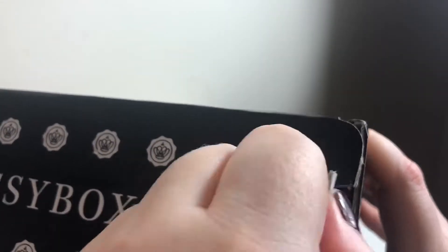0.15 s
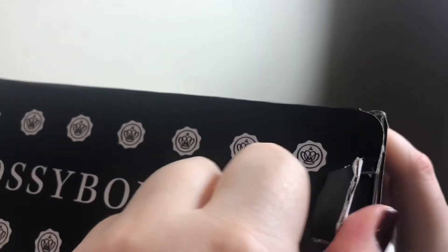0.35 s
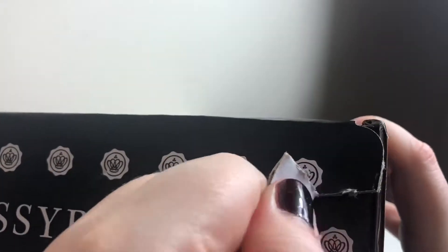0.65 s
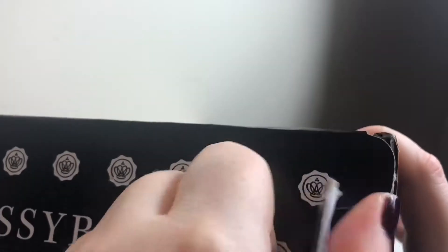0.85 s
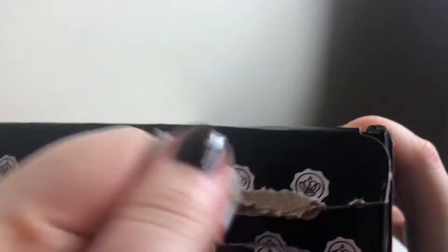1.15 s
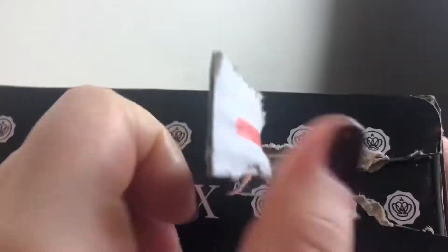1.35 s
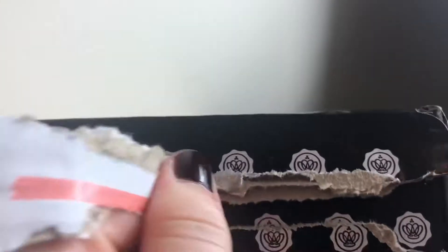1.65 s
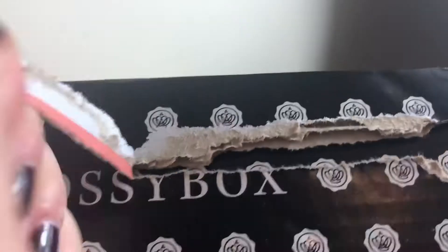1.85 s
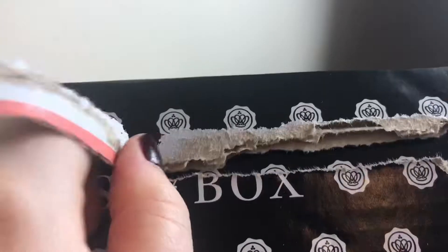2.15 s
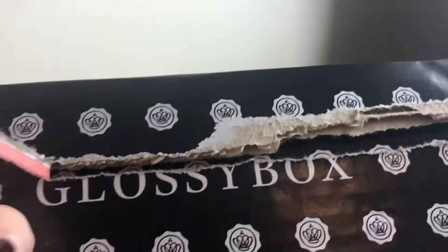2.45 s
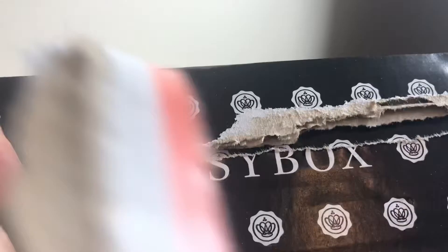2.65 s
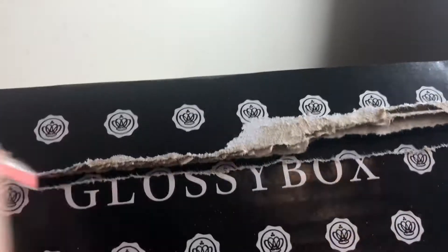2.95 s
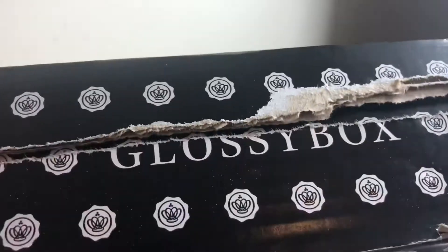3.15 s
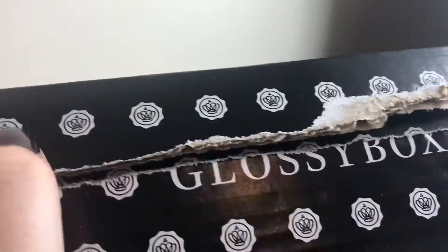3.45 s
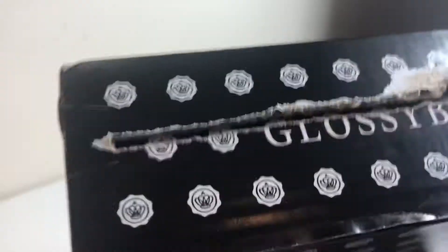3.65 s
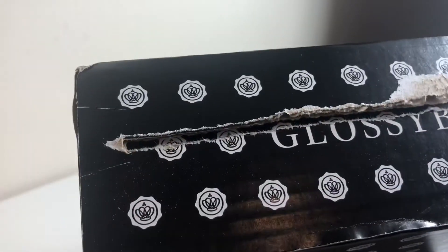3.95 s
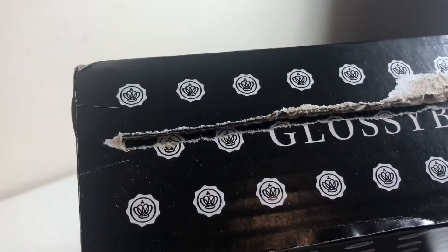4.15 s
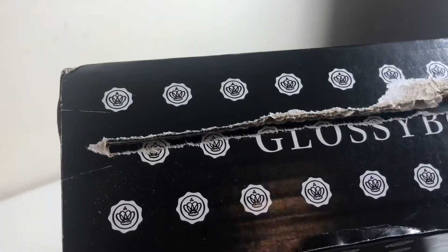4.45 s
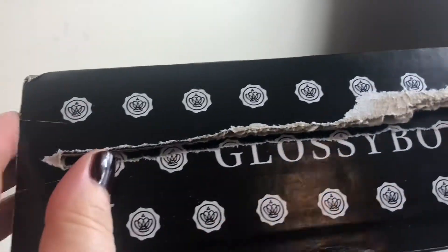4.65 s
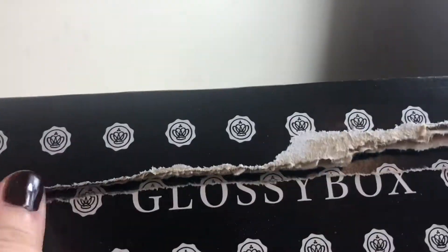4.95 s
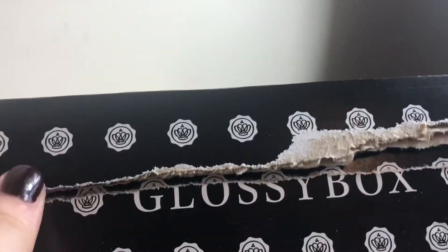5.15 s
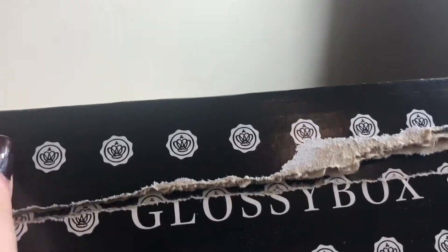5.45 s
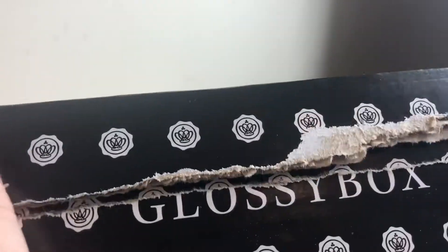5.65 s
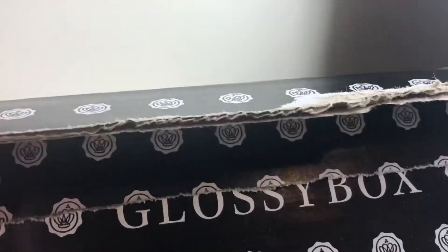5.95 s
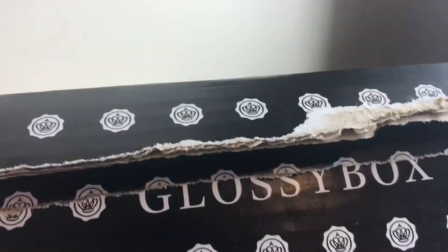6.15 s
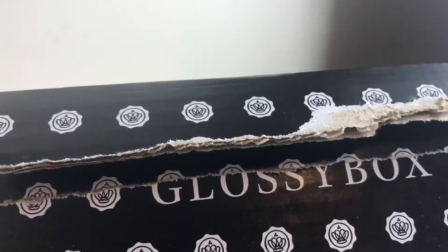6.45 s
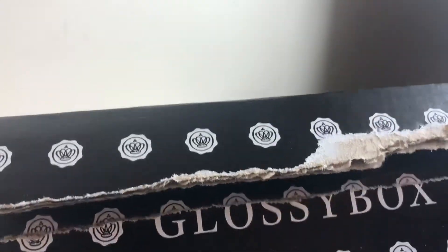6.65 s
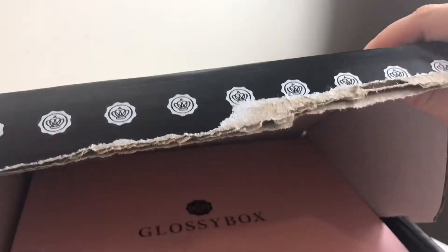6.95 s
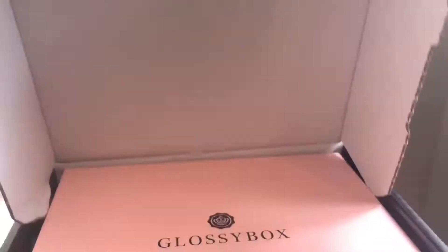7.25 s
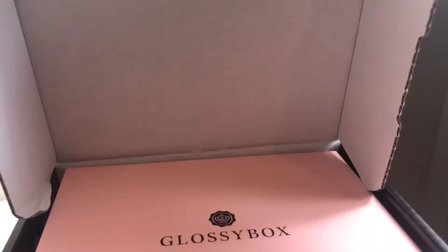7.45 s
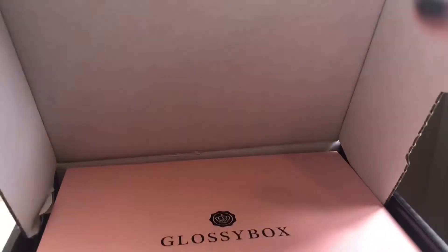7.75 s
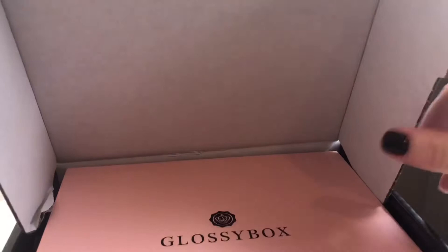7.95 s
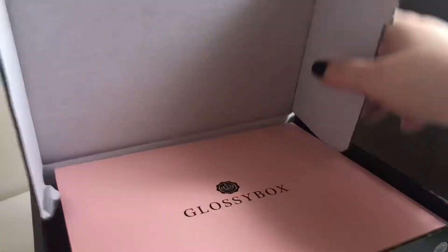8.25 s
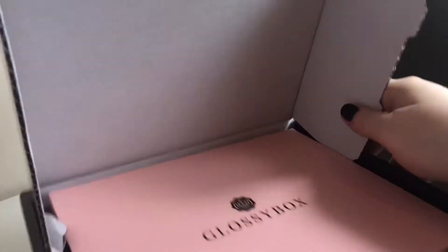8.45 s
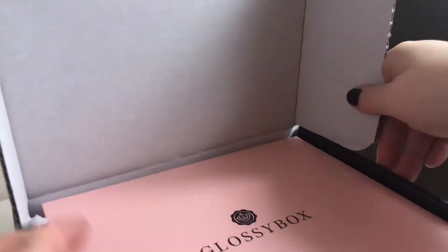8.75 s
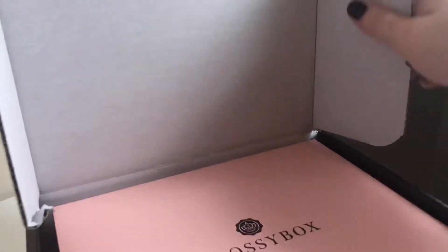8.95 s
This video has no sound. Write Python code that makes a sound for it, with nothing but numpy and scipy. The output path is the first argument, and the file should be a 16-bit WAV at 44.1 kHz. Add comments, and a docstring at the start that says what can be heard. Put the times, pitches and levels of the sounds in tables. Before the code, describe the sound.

Close cardboard cracks and finger rubs, then five short gritty rips along a tear strip, followed by rubbing, knocks and scraping flaps.

```python
"""Small cracks and rubbing fingers on cardboard lead into five ripping pulls on the tear strip of a mailing box.
Each pull is a dense run of random fibre breaks filtered by the board; the last ties of the strip snap singly.
Later, fingers rub and tap the board, bright swipes hiss, the lid pops out of its slots and is folded back
with scraping flaps. Cracks and knocks are pushes and noise bursts that ring one spot; rubs are noise mixed with
sparse catches. Creaks are stick-slip trains, the peeling liner a narrow rasp; reflections and quiet air surround all."""
import sys
import numpy as np
from scipy import signal
from scipy.fft import rfft, irfft, next_fast_len
from scipy.io import wavfile
from scipy.ndimage import uniform_filter1d, map_coordinates

SR = 44100
rng = np.random.default_rng(int(sys.argv[2]) if len(sys.argv) > 2 else 0)


def log_audio(samples):
    """Write samples as a 16-bit WAV file to the path given in sys.argv[1]."""
    # one column per channel
    frames = np.atleast_2d(samples).T
    # limit to full scale, then quantise
    limited = np.clip(frames, -1, 1)
    pcm = np.round(limited * 32767).astype(np.int16)
    wavfile.write(sys.argv[1], SR, pcm)


N = 400869
TIME = np.arange(N) / SR
SIZE = next_fast_len(N + SR)
HZ = np.maximum(np.fft.rfftfreq(SIZE, 1 / SR), 1)
TOP_HZ = 15950  # band limit of the sound
STRIP_OFF, LID_UP = 3.4, 6.9  # s, when the box starts to sound slit, and with its lid raised
SNAP_CENTRES_HZ = [200, 570, 1900, 7500]  # thud, knock, crack and tick registers

# Pulls on the strip. Each row: takes hold, gives way and stops in seconds,
# then relative levels of body, crackle and fizz in dB.
PULL_TABLE = [(1.088, 1.224, 1.315, -48, -44, -33.5), (1.637, 1.749, 1.828, -40, -36.5, -31.5),
              (2.328, 2.431, 2.463, -34.5, -31, -28.5), (2.976, 3.06, 3.115, -37, -29.5, -33),
              (3.487, 3.552, 3.69, -46, -53.5, -47.5)]


def amp(db):
    """Level definition: decibels to amplitude gain."""
    return 10 ** (np.asarray(db) / 20)


def unit(x):
    """Power normalisation: x scaled to rms 1."""
    return x / np.sqrt(np.mean(np.abs(x) ** 2) + 1e-20)


def along(points, hz):
    """Logarithmic interpolation: (Hz, value) points read on a log frequency axis."""
    f, v = np.transpose(points)
    return np.interp(np.log(hz + 1), np.log(f), v)


def filtered(x, response):
    """Linear filtering: the spectrum of x times a response on the HZ grid."""
    return irfft(rfft(x, SIZE) * response, SIZE)[:N]


def registers(edges_hz, order=8):
    """Power-complementary crossover: gains that share the spectrum among registers, low to high."""
    low_passes = [1 / (1 + (HZ / edge) ** order) for edge in sorted(edges_hz)]
    below = [0 * HZ] + low_passes + [1 + 0 * HZ]
    return np.sqrt(np.abs(np.diff(below, axis=0)))


def resonance(hz, width, db, grid=HZ):
    """Damped second-order resonance: a causal lift of db around hz."""
    return 1 + (amp(db) - 1) * 1j * grid * width / (hz * hz - grid * grid + 1j * grid * width)


def stroke(start, end, rise, fall):
    """Amplitude gating: a level that ramps up around start and down around end."""
    top = start + rise
    return np.interp(TIME, [start - 2 * rise, top, max(end - fall, top), end + 2 * fall], [0, 1, 1, 0])


def wobble(per_second):
    """Band-limited randomness: a smooth random curve with per_second knots a second."""
    return map_coordinates(rng.standard_normal(int(TIME[-1] * per_second) + 4), [TIME * per_second])


def tilted(colour_db, db_per_octave, centres_hz):
    """Spectral tilt: register levels in dB, tipped about 1900 Hz."""
    return np.add(colour_db, db_per_octave * np.log2(np.divide(centres_hz, 1900)))


def fibres(per_second, scatter_db, colour_db, even_over):
    """Poisson-like fracture: random breaks of random size and colour in three registers.

    The power is evened over even_over seconds."""
    def chance(shape):
        return np.clip(rng.standard_normal(shape), -2, 2)

    size_db = scatter_db * chance(N) + colour_db * chance((3, N))
    sizes = amp(size_db) * rng.choice([-1, 1], (3, N))
    breaks = sizes * (rng.random(N) < per_second / SR)
    power = np.abs(uniform_filter1d(breaks ** 2, max(int(even_over * SR), 2)))
    return breaks / np.sqrt(power + np.mean(power) / 20)


def wandering(x, patchy_db, width_hz, seconds):
    """Position-dependent excitation: the colour shifts as the contact travels over the panel."""
    z = signal.stft(x, nperseg=256)[2]
    bins, frames = np.indices(z.shape)
    u = bins * SR / 256 / width_hz
    v = frames * 128 / SR / seconds
    knots = rng.standard_normal((int(u.max()) + 2, int(v.max()) + 2))
    field = map_coordinates(knots, [u, v], order=1)
    return signal.istft(z * unit(amp(patchy_db * unit(field))), nperseg=256)[1][:N]


def board(spectrum, modes, lag_cycles):
    """Modal radiation with bending-wave dispersion: resonances ring on and the lows arrive late."""
    lag = np.exp(-2j * np.pi * lag_cycles * (np.log(HZ) - HZ / TOP_HZ))
    ring = np.prod([resonance(*mode) for mode in modes], axis=0)
    return amp(along(spectrum, HZ)) * lag * ring


def box_states():
    """Modal change: responses of the box with its strip attached, slit, and with its lid raised."""
    # Radiation in each state. Each row: frequency in Hz, relative level in dB.
    sealed = [(25, -43), (45, -36.5), (75, -21.5), (110, -13), (160, -2), (290, -4), (420, 0.5), (640, -3),
              (850, -9), (1500, -6.5), (2600, -4.5), (3700, -11), (6000, -7.5), (16000, -11.5)]
    slit = [(25, -30), (45, -27), (75, -10.5), (110, -3), (170, 2), (260, -1.5), (400, 0.5), (650, 0.5),
            (1000, -5), (1600, -1.5), (2600, -7.5), (4500, -8.5), (10000, -12), (16000, -10.5)]
    raised = [(25, -32.5), (45, -47), (75, -15.5), (110, -8), (170, 2), (300, -4), (500, -4), (800, -6),
              (1500, 1), (2600, -3), (5000, -13.5), (7500, -13), (16000, -16)]
    # Panel resonances in each state. Each row: frequency in Hz, width in Hz, lift in dB.
    sealed_modes = [(382, 40, 4), (476, 48, 3), (596.5, 65, 2.5), (940, 160, 5), (1230, 72, 6.5),
                    (1635, 60, 4), (2430, 420, 3), (2790, 73, -1.5), (5500, 850, 2.5), (6900, 590, -1)]
    slit_modes = [(241.8, 29, 2), (386, 40, 2.4), (578, 69, 1.8), (946, 72, 6.4), (2370, 290, 5.8),
                  (10350, 2700, 4.3)]
    raised_modes = [(274, 40, 7.4), (390, 40, 6.7), (514, 14, 3.6), (692, 31, 6.5), (993, 100, 4),
                    (1363, 97, 8.7), (1925, 36, 2.9), (2300, 400, 2.2), (5300, 700, 6.4), (9900, 1200, 5.3)]
    return (board(sealed, sealed_modes, lag_cycles=1.5), board(slit, slit_modes, lag_cycles=1.9),
            board(raised, raised_modes, lag_cycles=1.2))


def radiate(drives, bands, box):
    """Forced vibration: one force per register drives the box, fading between its three states."""
    slit, lid = (np.clip((TIME - s) * 10, 0, 1) for s in (STRIP_OFF, LID_UP))
    spectrum = 0
    for share, response in zip((1 - slit, slit - lid, lid), box):
        for drive, band in zip(drives, bands):
            spectrum = spectrum + rfft(drive * share, SIZE) * unit(band * response)
    return irfft(spectrum, SIZE)[:N]


def room_air():
    """Stationary noise: the quiet steady background of the room."""
    # Background spectrum. Each row: frequency in Hz, relative spectral level in dB.
    air_points = [(15, -64), (25, -31.5), (92, -6.5), (335, 4), (659, -14), (863, -8.5), (1400, -6.5),
                  (2840, -23), (13200, -29), (16000, -38)]
    return amp(-79.0) * unit(filtered(rng.standard_normal(N), amp(along(air_points, HZ))))


def reflections(x, t60, gap):
    """Diffuse reverberation: noise that starts after gap seconds and decays at t60 (Hz, s)."""
    hz, t, z = signal.stft(rng.standard_normal(SR // 2), SR, nperseg=256)
    decay = amp(-60 * t / along(t60, hz)[:, None])
    tail = signal.istft(z * decay, SR, nperseg=256)[1]
    tail = np.pad(tail / np.linalg.norm(tail), (int(gap * SR), 0))
    return signal.fftconvolve(x, tail)[:N]


def near_surfaces(direct):
    """Early reflection: the wall and table just behind the box answer quickly."""
    return amp(-10.5) * reflections(direct, [(200, 0.13), (2000, 0.082), (12000, 0.078)], gap=.002)


def far_room(direct):
    """Late reverberation: the small room answers softly."""
    # Decay of the room. Each row: frequency in Hz, time to fall by 60 dB in seconds.
    room_decay = [(120, 0.26), (500, 0.19), (2500, 0.19), (8000, .22), (16000, 0.15)]
    return amp(-28) * reflections(direct, room_decay, gap=0.0091)


def rubbing(box, crumb_time=.0006, attack=.008, release=0.01):
    """Sliding friction: skin and flaps catch on the board, dull ticks below and crumbling bursts on top."""
    # Hands shifting their grip. Each row: time in seconds, relative level in dB.
    grip = [(0, -69.5), (0.72, -67.5), (0.805, -74), (0.85, -67), (1.05, -62.5), (1.38, -66), (1.47, -80),
            (1.55, -68), (1.87, -65.5), (2.66, -70.5), (2.9, -62.5), (3.3, -64.5), (3.76, -71), (3.9, -80),
            (4.58, -83.5), (4.63, -70.5), (5.66, -69.5), (5.73, -83), (5.82, -70), (6.2, -68.5),
            (6.5, -89.5), (6.58, -70), (6.82, -86.5), (7.72, -69), (7.85, -100), (8.1, -70), (9.08, -72)]
    # Fingers sliding. Each row: start and end in seconds, relative level in dB, brightness in dB per octave.
    rubs = [(0.38, 0.66, -62.5, -1), (0.99, 1.09, -58, 0), (1.51, 1.64, -64, 0.5), (2.11, 2.26, -61, 0),
            (2.72, 2.8, -69, 1), (3.33, 3.42, -61.5, -2), (4.03, 4.15, -83.5, 5.5), (4.88, 5.08, -71, -1),
            (5.2, 5.44, -62.5, -0.5), (5.46, 5.6, -62.5, -1.5), (5.63, 5.7, -61, 2), (5.755, 5.86, -56, 1),
            (5.97, 6.05, -63.5, 0.5), (6.11, 6.17, -57, 3), (6.69, 6.79, -76, 5.5)]
    # Side flaps scraping along the walls of the box, in the same columns.
    scrapes = [(6.83, 6.92, -74, -4), (7.04, 7.09, -68.5, -3), (7.13, 7.22, -54.5, -0.8),
               (7.22, 7.31, -56, 2), (7.375, 7.42, -59, -2), (7.48, 7.6, -64.5, -.5),
               (7.655, 7.77, -60.5, -0.5), (7.98, 8.03, -56.5, 0.6), (8.06, 8.17, -58.5, -0.5),
               (8.255, 8.35, -58, -2), (8.36, 8.65, -66, 1.5), (8.68, 8.76, -72, -3.5),
               (8.94, 9.09, -59.5, -1)]
    # Colours of rubs and of scrapes: body, scrape and hiss in relative dB.
    rub_colour = [-1, -5.5, -3]
    scrape_colour = [-1, -1.5, -1.5]
    centres_hz = [350, 1900, 7500]

    press_db = 2.5 * wobble(per_second=22)  # the fingers press unevenly
    grip_level = amp(np.interp(TIME, *np.transpose(grip)) + press_db)
    power = np.outer(amp(rub_colour), grip_level) ** 2
    for slides, colour_db in ((rubs, rub_colour), (scrapes, scrape_colour)):
        for start, end, db, bright in slides:
            level = amp(db + tilted(colour_db, bright, centres_hz))
            power += np.outer(level ** 2, stroke(start, end, attack, release) ** 2)

    # share of catches in each register: the torn strip crackles, the glossy lid slides more smoothly
    catching = np.where(TIME < STRIP_OFF, [[.85], [.85], [.6]], [[.8], [.75], [.25]])
    catches = fibres(per_second=110, scatter_db=7, colour_db=3.0, even_over=0.098)
    crumbs = np.abs(uniform_filter1d(catches[2] ** 2, max(int(crumb_time * SR), 2)))
    catches[2] = np.sqrt(crumbs) * rng.standard_normal(N)
    smooth = rng.standard_normal(N)
    force = np.sqrt(power) * (np.sqrt(catching) * catches + np.sqrt(1 - catching) * smooth)
    sound = radiate(force, registers([800, 3500]), box)
    return amp(-0.5) * wandering(sound, patchy_db=2.5, width_hz=600, seconds=.025)


def swiping(corner_hz=4000):
    """Smooth sliding friction: skin or a flap sliding on gloss gives a bright hiss, not filtered by the box."""
    # Swipes of fingers and flaps on the glossy board. Each row: start and end in seconds, level in dB.
    swipes = [(4.715, 4.751, -53.5), (4.785, 4.811, -57.5), (4.945, 4.955, -58), (5.775, 5.813, -45.5),
              (5.892, 5.913, -52), (6.018, 6.035, -63.5), (6.362, 6.428, -67.5), (6.136, 6.156, -53.5),
              (7.24, 7.31, -50.5), (7.375, 7.405, -52)]
    level = sum(amp(db) * stroke(start, end, rise=.005, fall=0.0033) for start, end, db in swipes)
    high_pass = HZ ** 2 / (HZ ** 2 + corner_hz ** 2)
    return level * unit(filtered(rng.standard_normal(N), high_pass))


def creaking(box, jitter=0.17, lift_db=14):
    """Stick-slip friction: board on board gives a short train of uneven ticks, all ringing one spot."""
    # Creaks under the fingers. Each row: start and end in seconds, first and last slips per second,
    # level in dB, pitch in Hz.
    creaks = [(0.556, 0.67, 75, 90, -57.5, 635), (5.249, 5.298, 110, 180, -53, 2370),
              (5.386, 5.436, 160, 120, -64.5, 2620)]
    creak = np.zeros(N)
    for start, end, first, last, db, hz in creaks:
        span = max(int((end - start) * SR), 2)
        turns = np.cumsum(np.linspace(first, last, span)) / SR
        at = np.flatnonzero(np.diff(np.floor(turns), prepend=-1))
        # jitter is a fraction of the first slip period
        at = at + (start + jitter / first * rng.standard_normal(len(at))) * SR
        sizes = amp(2.8 * rng.standard_normal(len(at)))
        slips = np.bincount(at.astype(int), sizes, N)
        slips *= np.sqrt(span / np.sum(slips ** 2))  # rms 1 over the creak
        spot = resonance(hz, hz / 4, lift_db)
        creak += amp(db) * filtered(slips, unit(box[0] * spot))
    return creak


def peeling(q=4.0):
    """Resonant adhesion failure: fibres let go under the stiff liner, which sings in a narrow treble band."""
    # Peels of the glossy liner. Each row: start and end in seconds, level in dB, pitch of the rasp in Hz.
    peels = [(0.573, .66, -58.5, 7400), (0.663, .74, -51.5, 6900), (1.08, 1.225, -51, 5700)]
    rasp = np.zeros(N)
    for start, end, db, hz in peels:
        grains = fibres(per_second=280, scatter_db=6, colour_db=4, even_over=.03)[0]
        grains = grains + 0.28 * rng.standard_normal(N)
        liner = (1j * HZ * hz / (hz * hz - HZ * HZ + 1j * HZ * hz * 1.7 / q)) ** 2
        rasp += amp(db) * filtered(grains * stroke(start, end, rise=.005, fall=.005), unit(liner))
    return rasp


def knocks():
    """Impact: fingers and lid strike the panels, as (s, length s, ring Hz, dB in four registers)."""
    # Each row: time in seconds, ring of the spot in Hz, relative level in dB,
    # brightness in dB per octave, extra thud of the whole panel in dB.
    knock_table = [(0.448, 390, -59.5, -2, -1), (0.4774, 390, -59.5, -5, -12), (0.762, 340, -55, 0, 1),
                   (1.3505, 597, -60.5, -3.5, -16), (1.4044, 245, -59.5, 0.5, 12),
                   (1.493, 584, -55.5, -1.5, -3), (2.377, 600, -42.5, -1.5, -15.5),
                   (2.5141, 420, -70.5, -4.5, 10), (2.5625, 1110, -61, -0.5, 5.5),
                   (2.703, 382, -62.5, 1, 16.5), (2.8499, 570, -60, -1, -4), (3.3644, 390, -59.5, 1.5, 0),
                   (3.7263, 565, -35, -3.5, -10.5), (5.479, 260, -60, -2.5, 4), (5.9179, 377, -57, -2.5, 5),
                   (5.983, 235, -59.5, 0, 12.5), (6.165, 253, -37, 0.5, 11.5),
                   (6.203, 644, -47.5, -5.5, -13), (7.2327, 330, -46, -2.5, 1),
                   (7.3802, 402, -61, -1.5, -3), (7.7525, 285, -61.5, -1, 8.5), (7.979, 305, -64.5, -3, 5),
                   (8.1133, 440, -58, -3.5, -7), (8.1876, 1310, -57.5, -1.5, 8.5),
                   (8.2387, 1230, -60.5, -3.5, -2), (8.295, 1440, -51.5, 0, 3), (8.32, 1410, -53.5, -1, 9),
                   (8.936, 606, -44.5, -2.6, -8), (8.9669, 1250, -53, -2, -11)]
    contact_s, colour_db = 0.0032, [-3.5, 1.5, -0.5, 0.5]
    return [(s, contact_s, hz, db + tilted(colour_db, bright, SNAP_CENTRES_HZ) + [thud, 0, 0, 0])
            for s, hz, db, bright, thud in knock_table]


def cracks():
    """Brittle failure: creases and tabs crack, in the same form as the knocks."""
    # Each row: time in seconds, length of the break in seconds, ring of the spot in Hz,
    # relative level in dB, brightness in dB per octave.
    crack_table = [(0.0716, 0.00071, 3750, -36.5, 4), (0.1327, .0011, 420, -61, 2),
                   (0.2687, 0.0014, 1230, -56, 1), (0.5034, .0011, 2470, -54, 1),
                   (0.5453, 0.00045, 2320, -44, 4.5), (0.8696, 0.0015, 3100, -58, 1.5),
                   (0.9346, 0.00098, 2270, -58.5, 2), (0.947, 0.00065, 9600, -61.5, 6),
                   (1.2534, 0.00062, 6000, -38, 1.5), (1.771, 0.0011, 2290, -36, 1),
                   (2.4467, 0.0044, 2890, -37, 3), (2.8094, 0.00024, 2500, -59, 1),
                   (2.9084, 0.0026, 300, -58, 0), (2.9641, 0.0012, 2390, -55.5, 1),
                   (3.0771, 0.0059, 2570, -32.5, 1), (3.1502, .0014, 1440, -49.5, -1.5),
                   (3.2444, 0.00059, 10900, -57, 4.5), (3.265, .0007, 11000, -70, 5.5),
                   (3.4939, .0012, 604, -58, -1.5), (4.356, .0028, 1905, -67.5, 1.5),
                   (4.5974, 0.0023, 3800, -52.5, 1.5), (5.1014, .0032, 562, -65, -2),
                   (5.1337, .0018, 2300, -60, -1.5), (5.176, 0.0012, 650, -57.5, 1.5),
                   (5.304, 0.0026, 7600, -54, 4.5), (5.447, .0037, 2160, -35, 2),
                   (5.526, .0015, 2400, -58.5, -1), (5.54, 0.0027, 302, -54.5, -0.5),
                   (5.6094, .0016, 494, -59, -0.5), (5.8177, 0.0023, 625, -37, 0.3),
                   (6.5453, 0.0025, 997, -57, -1.5), (6.6325, .0046, 7640, -64.5, 3.5),
                   (6.966, .002, 1500, -61, -2), (7.1968, .0016, 8530, -54.5, 3),
                   (7.504, 0.0032, 256, -54.5, 1.5), (7.5743, .0018, 268, -50, 1),
                   (7.6629, .0031, 1625, -56.5, -0.5), (8.0797, .0015, 2080, -42, 1),
                   (8.283, 0.00093, 5540, -41, 0), (8.6348, .0023, 1250, -64.5, -2.5),
                   (8.6727, 0.005, 1240, -57.5, -1), (8.6953, .0015, 1250, -59, -.5),
                   (8.7399, 0.0022, 1480, -59.5, 2.5), (8.7996, 0.0034, 1230, -54, -1.5),
                   (8.8166, 0.0015, 1230, -54.5, -2), (9.085, .002, 1910, -54, 0.5)]
    # Thud, knock, crack and tick in relative dB.
    colour_db = [-7.5, 0.5, -1.5, 0]
    return [(s, length, hz, db + tilted(colour_db, bright, SNAP_CENTRES_HZ))
            for s, length, hz, db, bright in crack_table]


def ties():
    """Tensile failure: the last ties of the strip break singly, in the same form as the knocks."""
    # Each row: time in seconds, relative level in dB.
    tie_table = [(3.5525, -42.5), (3.5666, -40.5), (3.5828, -43), (3.5988, -48), (3.6142, -43.5),
                 (3.6272, -51), (3.654, -43), (3.679, -36)]
    break_s, ring_hz, colour_db = .0017, 6100, [-2, -5, 1, 4]
    return [(s, break_s, ring_hz, np.add(db, colour_db)) for s, db in tie_table]


def snapping(box, crumble=0.97, lift_db=8, q=2.8, onset_level=0.17, onset_time=0.0028):
    """Impulsive excitation: a push and a burst of breaks ring that spot, after a faint soft onset."""
    # Boom of the whole panel under every snap: frequency in Hz, width in Hz, lift in dB.
    boom = (172, 91, 7.3)
    count, ahead = SR // 20, SR // 100  # samples in a snap, and those before its push
    t = (np.arange(count) - ahead) / SR
    grid = np.fft.rfftfreq(count, 1 / SR)
    bands = registers([330, 1000, 3500])
    shares = np.array([np.interp(grid, HZ, band) ** 2 for band in bands])
    force = np.zeros((4, N + count))

    def energy_one(x):
        return x / np.linalg.norm(x)

    for s, length, hz, levels in ties() + cracks() + knocks():
        push = 1. * (t == 0)
        age = np.maximum(t, 0) / max(length, 1 / SR)
        noise = rng.standard_normal(count)
        onset = onset_level * energy_one(noise * (t < 0) * np.exp(-np.abs(t) / onset_time))
        burst = onset + energy_one(noise * np.sqrt(age) * np.exp(-1.5 * age))
        parts = np.array([push, push, .5 * push + crumble * burst, 0.094 * push + 1.155 * burst])
        spot = resonance(hz, hz / q, lift_db, grid)
        # the added energy of the ring is partly levelled out in each register
        boost = shares @ np.abs(spot) ** 2 / shares.sum(axis=1)
        parts = irfft(rfft(parts) * spot, count) / boost[:, None] ** 0.2
        begin = round(s * SR) - ahead
        force[:, begin:][:, :count] += amp(levels)[:, None] * parts
    booming_box = [state * resonance(*boom) for state in box]
    return amp(23.5) * radiate(force[:, :N], bands, booming_box)


def ringing_along(x):
    """Local resonance: the body of each pull rings the part of the panel that the tear has reached."""
    ring_hz = [420, 560, 537, 390, 200]  # one per pull
    q, lift_db = 4.3, 9.5
    nearest = np.abs(TIME - np.array(PULL_TABLE)[:, 1:2]).argmin(axis=0)
    rung = sum(filtered(x * (nearest == k), resonance(hz, hz / q, lift_db)) for k, hz in enumerate(ring_hz))
    return rung * amp(-lift_db / 2)


def tearing(box, rise=0.0017, fall=0.0035, grit=0.68):
    """Progressive fracture: each pull creeps faster, runs as the panel joins in, then dies away.

    Coarse fibres break over a bed of fine ones."""
    # Forward jerks of the strip. Each row: start and end in seconds, level against the full run in dB.
    jerks = [(1.086, 1.106, -11.5), (1.142, 1.147, -5.5), (1.172, 1.185, -10), (1.202, 1.208, -4),
             (1.691, 1.697, -1), (2.362, 2.393, -11.5), (2.393, 2.41, -10), (3.008, 3.06, -10)]
    hold_db, creep_db = -27.5, -11.5  # creep at the hold and at giving way, against the full run
    body_swell_db = 7  # rise of the body over a run
    after_db, after_fall = -26.5, 218  # dB against the full run, dB per second

    def gate(start, end):
        return (1 + np.tanh((TIME - start) / rise)) * (1 + np.tanh((end - TIME) / fall)) / 4

    power = sum(amp(db) ** 2 * gate(start, end) for start, end, db in jerks)
    swell = np.zeros(N)
    for hold, give, stop, *_ in PULL_TABLE:
        creep = amp(np.interp(TIME, [hold, give], [hold_db, creep_db])) ** 2 * gate(hold, give)
        after = amp(after_db - after_fall * np.clip(TIME - stop, 0, 1)) ** 2 * (TIME > stop)
        run = gate(give, stop)
        power = power + creep + run + after
        swell += run * np.interp(TIME, [give, stop], [-.5, .5])

    _, gives, _, *colour = np.transpose(PULL_TABLE)
    levels = np.array([np.interp(TIME, gives, db) for db in colour])
    levels[0] += body_swell_db * swell
    coarse = fibres(per_second=800, scatter_db=4, colour_db=4.0, even_over=0.02)
    fine = rng.standard_normal(N)
    force = amp(levels) * np.sqrt(power) * (np.sqrt(grit) * coarse + np.sqrt(1 - grit) * fine)
    force[0] = ringing_along(force[0])
    sound = radiate(force, registers([800, 3500]), box)
    return wandering(sound, patchy_db=2.5, width_hz=500, seconds=.01)


def scene():
    """Superposition: the handled box, the surfaces just behind it, and the quiet room."""
    box = box_states()
    direct = rubbing(box) + swiping() + creaking(box) + peeling() + snapping(box) + tearing(box)
    return (direct + near_surfaces(direct) + far_room(direct) + room_air())[None]


def record(dry):
    """Band limitation: nothing passes at or above TOP_HZ."""
    return filtered(dry[0], HZ < TOP_HZ)[None]


dry = scene()
out = record(dry)
log_audio(out)
```